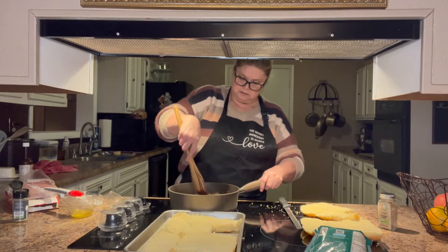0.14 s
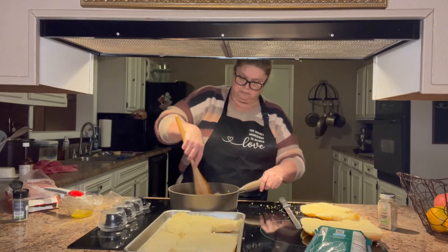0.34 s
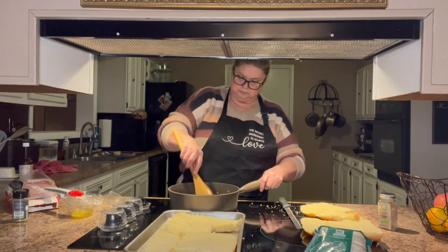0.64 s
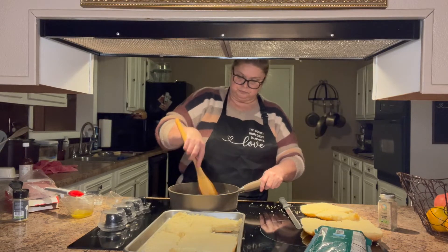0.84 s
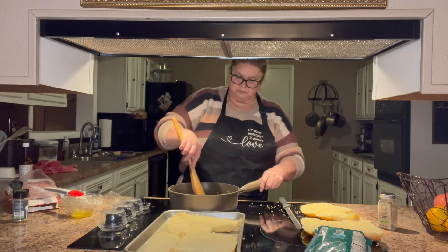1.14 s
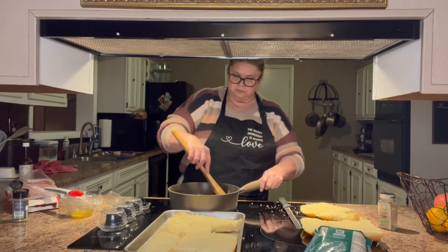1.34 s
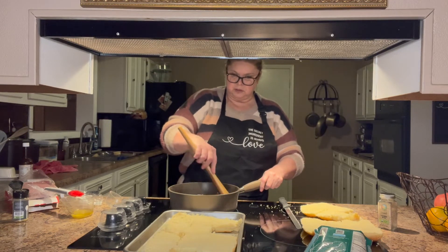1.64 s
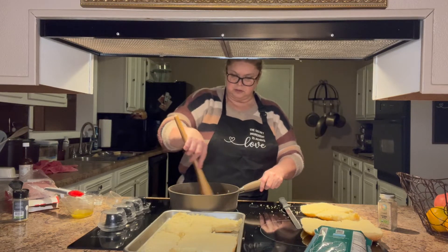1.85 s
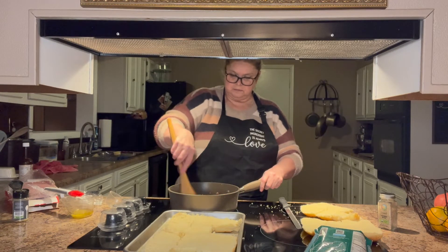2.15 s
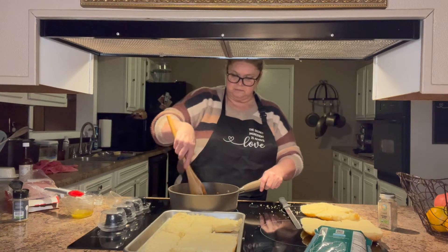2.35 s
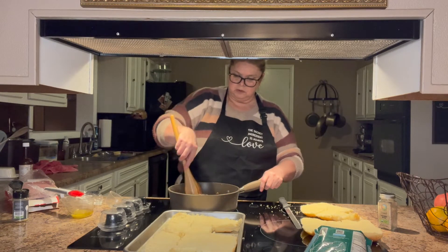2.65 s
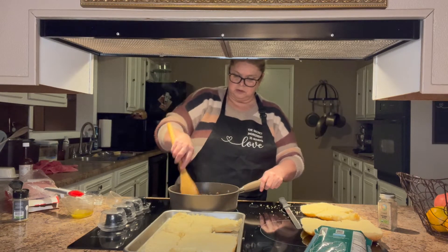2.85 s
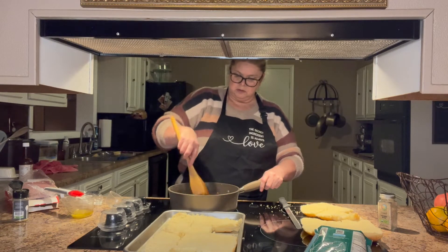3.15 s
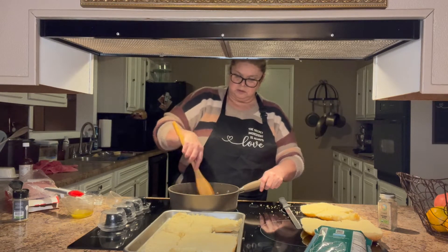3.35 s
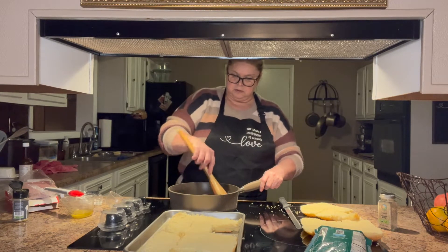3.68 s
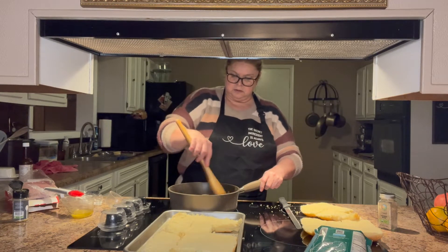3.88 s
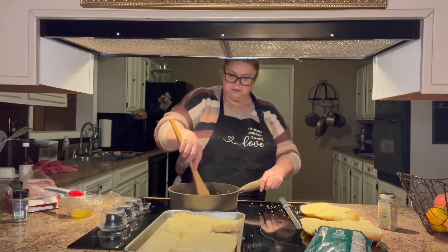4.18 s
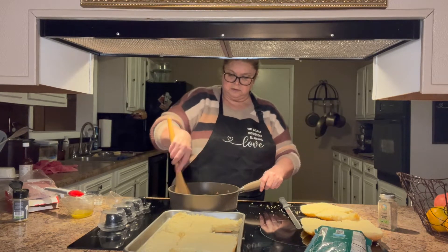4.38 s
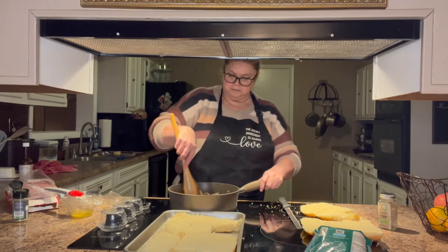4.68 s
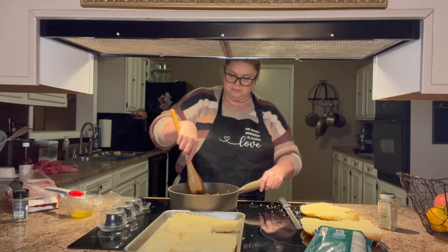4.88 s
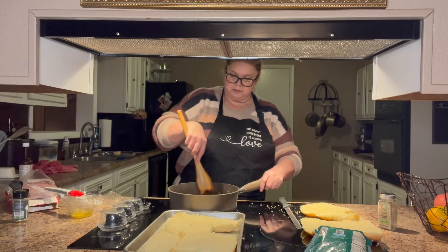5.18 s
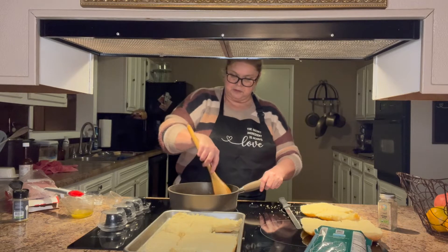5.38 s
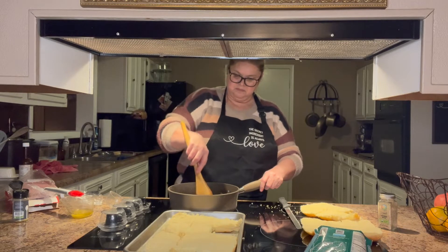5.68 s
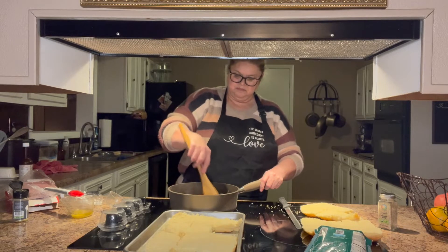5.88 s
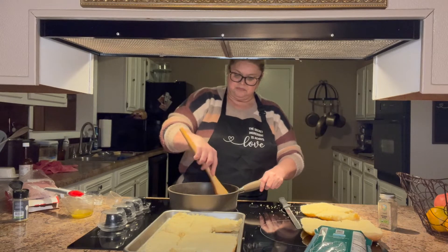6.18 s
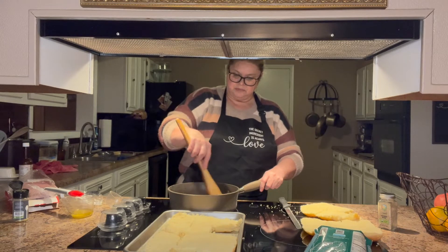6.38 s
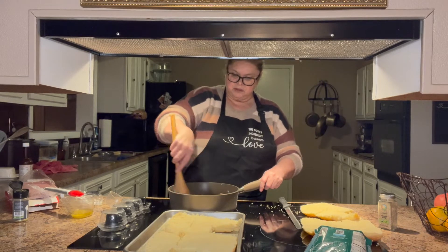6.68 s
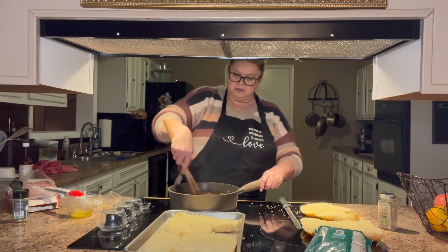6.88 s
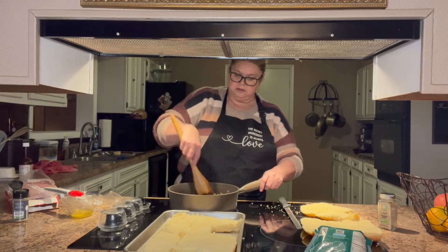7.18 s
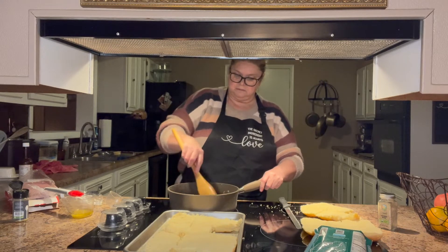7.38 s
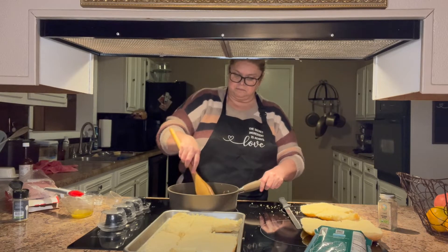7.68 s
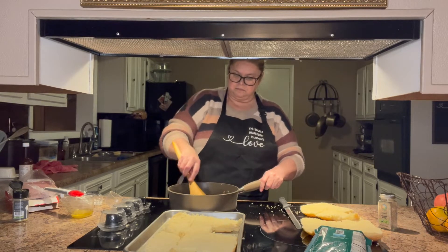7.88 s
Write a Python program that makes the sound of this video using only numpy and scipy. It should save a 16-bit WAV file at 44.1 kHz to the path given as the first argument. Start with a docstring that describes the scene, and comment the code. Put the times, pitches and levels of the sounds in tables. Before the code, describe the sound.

Irregular woody thumps and a few bright metallic pings as food is stirred in a pan, with soft sizzling and fan-like hum.

```python
"""A wooden spatula chops and stirs meat in a skillet on a glass cooktop, in a kitchen.
Each blow layers wood, pan and cooktop modes with a crack, a bright ring and a tick of bare metal.
Glancing touches ping the rim, stick-slip noise drags over the pan, and the pan drops back with dull thuds.
Below sit soft stove rumbles, a sizzle of shaped hiss and pops that swells with each spit, and a low steady whirr.
Early echoes, a flutter under the hood and a short diffuse tail place the impacts in the kitchen."""
import sys
import numpy as np
from scipy import signal
from scipy.fft import rfft, irfft, next_fast_len
from scipy.io import wavfile
from scipy.ndimage import uniform_filter1d

SR = 44100
rng = np.random.default_rng(int(sys.argv[2]) if len(sys.argv) > 2 else 0)


def master(y):
    """Save y as 16-bit WAV."""
    cut = np.clip(np.atleast_2d(y).T, -1, 1)
    pcm = np.round(cut * 32767)  # scale
    wavfile.write(sys.argv[1], SR, pcm.astype(np.int16))


N = 354123

# spatula blows: (t/s, force level/dB, contact hardness f/Hz, wood pitch factor, upper wood level/dB,
#   cooktop thud level/dB, pan ring level/dB, bare-metal level/dB,
#   share of the pan's ring time that the resting blade leaves, low cut f/Hz: glancing blows push little bass)
SPATULA_BLOWS = [(0.2401, -9, 2900, 0.98, -3.5, -7, 4.5, -8, 1, 556),
                 (0.289, 3.5, 1100, 0.93, -2.5, -2, -24, -26, 0.79, 243),
                 (.989, 2, 1550, 1.05, 9, -1, -2, -17, 0.93, 382),
                 (1.581, 2, 860, 1.04, 1.5, -3.5, -6.5, -26, 1, 246),
                 (1.932, 2.5, 1030, 1.11, 2.5, -0.5, -1, -20, 0.84, 237),
                 (2.4927, -3, 2620, 0.92, -5, 1.5, 12, -0.5, 1, 397),
                 (2.511, -6.5, 2380, 1.1, 8.5, 4, 2, -9, 1, 450),
                 (3.273, -2, 1190, 1.16, 2, 3, -8, -21, 0.35, 280),
                 (3.5899, 2.5, 1510, 1.1, -18, -9.5, -1, -6.5, 0.77, 382),
                 (4.5371, 5, 1203, 1.22, -3, -12.5, -6.5, -20, 0.85, 284),
                 (4.9333, 10, 1244, 0.95, -5.5, -7, -8.5, -23.5, 0.79, 287),
                 (5.1667, 3.5, 1480, 1.2, -15, -11, 1, -10.5, .8, 364),
                 (5.2429, 7.5, 1330, 1.01, -1, 0, -7, -19.5, 1, 260),
                 (5.5849, 7.5, 1136, 1.17, -9, -11, -10, -30.5, 0.48, 300),
                 (5.6246, -7, 880, 1.15, -3, -13, -18, -16.5, 1, 214),
                 (5.8635, 15.5, 1980, 1.19, -5.5, -12, -6.5, -18.5, 0.58, 375),
                 (5.9026, -3.5, 1020, 1, 1, -20, -5, -8, 0.64, 240),
                 (6.462, 1.5, 1056, 1.24, 6, 1, -1.5, -24, 0.84, 285),
                 (7.157, 11, 2670, 1.12, -2, -23, -26, -9, 0.81, 570),
                 (7.1804, 1.5, 1450, 1.3, -1, 1.5, 5.5, -28, 0.62, 280),
                 (7.187, 0, 1460, 0.74, -2, -5, -24, -29, 1, 280),
                 (7.83, -2.5, 900, 1.12, -6, -8, -11, -24, 0.77, 280)]
# dull spatula modes before the pitch factor: (f/Hz, level/dB, t60/s)
WOOD_MODES = [(370, -23, 0.068), (686, -8.5, 0.017), (1070, -1.5, 0.0081), (1297, -4, 0.0071),
              (1900, -38, 0.0019), (2800, -29, 0.0019)]
# pan floor and wall, damped by the food: (f/Hz, level/dB, full t60/s)
PAN_MODES = [(360, -19.5, .22), (630, -23, .15), (703, -16, .16), (765, -23, .14), (855, -18.5, .13),
             (915, -24.5, .12), (1065, -26, .09), (1280, -26, .11), (1330, -26, .12), (1485, -22.5, .1),
             (1683, -24, .12), (1998, -20.5, .04), (2215, -31, .08), (2795, -38, .07), (3200, -43, .04)]
# bright wall modes that only a touch on bare metal wakes: (f/Hz, level/dB, t60/s)
WALL_MODES = [(2240, 0, .1), (2440, -1, .1), (2798, 0, .11), (3173, -4, .11), (3690, -5, .07),
              (4340, -5, .09), (5050, -7, .06), (5560, -4, .07), (6150, -7, .04)]
# free rim before the pitch and ring-time factors: (f/Hz, level/dB, t60/s)
RIM_MODES = [(2207, -29, .2), (2322, -20.5, .25), (2348, -21.5, .26), (2362, -12, .035), (2398, -24, .22),
             (2445, -31, .2), (4301, -41, .13)]
# cooktop panel under the pan: (f/Hz, level/dB, t60/s)
PANEL_MODES = [(60, -36, .4), (233, -23, .16), (304, -13.5, .16), (361, -11.5, .17), (398, -19, .12),
               (445, -22, .1)]
# dense rumble of stove and cabinet: (f/Hz, relative level/dB)
CABINET_COLOUR = [(25, -27), (42, -6), (62, -2), (110, -2.5), (200, -3), (330, 3.5), (470, -1.5),
                  (700, -3.5), (1500, -21), (4000, -47)]
# blade drags: (t/s, length/s, level/dB, pan ring level/dB, rub pitch factor,
#   climb over the stroke/octaves, judder depth 0-1)
BLADE_DRAGS = [(1.668, 0.095, -42.5, -1, 1.04, -0.023, .5), (1.99, 0.15, -43, -20, 0.95, .3, 0.56),
               (2.075, 0.18, -42, -15, 1.014, -0.32, .5), (2.929, 0.13, -43, -10, 1.06, .6, 0.56),
               (3.298, 0.12, -41.5, -9, 0.96, 0, 0.3), (4.011, 0.2, -61, -14, 0.96, 0.021, 0.1),
               (4.26, .15, -59, 2.5, 0.86, 0, 0.3), (6.548, 0.24, -43, -17, 0.98, -0.18, 0.33),
               (6.741, 0.13, -41, -13, 0.97, -.15, 0.4), (6.82, 0.11, -51, -2.5, 0.88, -.3, .6),
               (7.243, 0.051, -27, -18, 1.3, -0.013, 0.2), (7.861, 0.1, -41, -25, 0.93, 0.041, 0.2)]
# colour of the rub before the pitch factor: (f/Hz, relative level/dB)
RUB_COLOUR = [(150, -40), (260, -25), (365, -8), (460, -16), (570, -6), (640, -5), (715, 2.5), (800, -2),
              (900, -5), (1050, -11), (1300, -12.5), (1600, -20), (1900, -27), (2300, -22), (3200, -25),
              (5000, -42)]
# soft shoves of the food that rock the pan: (t/s, length/s, level/dB)
FOOD_SHOVES = [(2.804, 0.17, -66), (4.261, 0.14, -58.5), (4.449, 0.086, -60), (5.616, 0.39, -54),
               (6.108, 0.17, -55), (6.744, 0.37, -61), (7.761, 0.088, -56)]
# colour of the sizzle: (f/Hz, relative level/dB)
STEAM_COLOUR = [(400, -25), (1200, -5), (2200, -2.5), (3200, -.7), (5000, 1), (6500, 0), (9000, 0),
                (11500, -4.5), (15500, -6.5)]
# colour of the kitchen's steady whirr: (f/Hz, relative level/dB)
WHIRR_COLOUR = [(20, -46), (45, -21), (60, 3), (85, -21), (120, -5.5), (190, -17), (450, -11.5),
                (600, -5.5), (660, -11.5), (700, 2), (750, -3.5), (870, -11.5), (1150, 0.5), (1450, -13),
                (2500, -11), (8000, -27)]
# two microphone ports: (f/Hz, likeness 0-1, phase lead of the left/rad, left minus right level/dB)
MIC_PORTS = [(60, .97, 0, -2), (140, .84, 0, -2), (300, .5, 0, -2), (1100, .4, 0, -1.5), (2500, .2, 0, -1),
             (5000, .2, .3, -4.5), (6700, .35, 3, -3), (8200, .92, 3.1, -1), (9300, .4, 3.2, 0),
             (10000, .1, 4.7, 0), (11500, .9, 6.3, 0), (13300, .2, 7.6, 0), (14600, .92, 9.4, 0)]
# first echoes from cooktop, hood and cupboards: (delay t/s, left gain, right gain)
FIRST_ECHOES = [(.0014, 0.1, 0.22), (.0062, .36, .08), (.0078, -.03, .33), (0.012, .14, .1),
                (0.0161, .15, .1)]
# decay of the diffuse tail before any added fade: (f/Hz, t60/s)
ROOM_DECAY = [(60, 0.52), (300, 0.39), (800, 0.39), (2000, 0.39), (3500, .34), (6000, 0.32), (14000, 0.16)]
# the blade glances off the free rim: (t/s, level/dB, pitch factor set by where it lands,
#   share of the ring time that the resting blade leaves, rattle depth 0-1)
RIM_GLANCES = [(.2402, -35, .9, .3, .9), (.289, -37, 1.01, .35, .8), (2.4925, -16, .85, .45, .8),
               (7.1575, -10, 1, 1, .45)]
# dry crack of wood on bare metal: (f/Hz, relative level/dB)
CRACK_COLOUR = [(80, -50), (400, 17), (1500, 19), (2600, 11.5), (3400, 14), (4300, 0), (5500, 10),
                (8000, -6), (11000, -5), (15000, -48)]
# juice squeezed onto hot metal spits: (t/s, length/s, peak level/dB before the hiss and pop gains)
JUICE_SPITS = [(0.153, 0.44, -62), (1.704, 0.18, -55.5), (1.9, 0.27, -60), (2.654, 0.15, -51.5),
               (2.828, 0.1, -54), (2.932, 0.21, -58), (3.41, 0.11, -58), (3.936, 0.26, -54.5),
               (4.22, 0.14, -55.5), (4.906, 0.3, -61), (5.237, 0.92, -60.5), (5.63, 0.41, -49.5),
               (6.067, 0.045, -69.5), (6.563, 0.15, -50.5), (7.304, 0.17, -53), (7.61, 0.45, -61.5)]
# the jolted pan drops back onto the cooktop: (t/s, relative level/dB)
PAN_DROPS = [(2.569, 0), (2.628, -11), (5.601, -3), (5.901, -5), (7.215, -9)]

EDGE_HZ = 15350  # top of the whole mix
RING_T = np.arange(int(.7 * SR)) / SR  # time axis of rings and tails, s
DRAG_ATTACK_S, DRAG_RELEASE_S = 0.053, 0.074  # the blade picks up speed, then slows
SLIPS_PER_S, SLIP_SPREAD_DB, RUB_SHARE = 3000, 1.0, .3  # rub: smooth noise gain against the slips
DRAG_GLIDE_OCTAVES = .15  # the rub is higher in mid stroke, where the blade is fastest
JUDDER_HZ, JUDDER_JITTER = 95, .3  # nominal catches a second, their relative unevenness (rms)
JUDDER_FADE = .3  # time constant of each slide, as a share of a cycle
CHATTER_S, RIM_FREE_S = .006, .24  # smoothing of the rattle; half-gain time as the blade stops the rim
SIZZLE_DB = -57  # meat lying still, before the hiss and pop gains
JUICE_DB, BOIL_OFF_S = -1, 1  # juice left by each spit keeps the sizzle up; time constant of its power
SPUTTER_DB, SPUTTER_S = .6, .04  # rms level swing and its smoothing


def amp(db):
    """Decibels to gain."""
    return 10 ** (np.asarray(db) / 20)


def unit(x):
    """Scales to an rms of one."""
    return x / np.sqrt(np.mean(x ** 2) + 1e-20)


def read(points, hz, axis=1):
    """Reads one table column along straight lines over log frequency."""
    table = np.transpose(points)
    return np.interp(np.log(hz + 1), np.log(table[0] + 1), table[axis])


def add(mix, s, sound):
    """Drops a sound into the mix at time s and trims what runs past the end."""
    part = mix[:, max(round(s * SR), 0):][:, :sound.shape[-1]]
    part += sound[..., :part.shape[-1]]


def colour(x, points):
    """Paints a smooth spectrum onto x and levels it to an rms of one."""
    count = x.shape[-1]
    size = next_fast_len(count + SR // 10)
    gain = amp(read(points, np.fft.rfftfreq(size, 1 / SR)))
    return unit(irfft(rfft(x, size) * gain, size)[..., :count])


def ports(pair):
    """Blends two unrelated noises into one diffuse sound as the two ports hear it."""
    size = next_fast_len(pair.shape[-1])
    hz = np.fft.rfftfreq(size, 1 / SR)
    shared, other = rfft(pair, size)
    same = np.clip(read(MIC_PORTS, hz), 0, 1)
    lean = amp(read(MIC_PORTS, hz, axis=3) / 2)  # half the level difference on each side
    right = same * shared + np.sqrt(1 - same ** 2) * other
    right = right * np.exp(-1j * read(MIC_PORTS, hz, axis=2))
    return irfft(np.array([shared * lean, right / lean]), size)[:, :pair.shape[-1]]


def ring(modes, pitch=1, length=1):
    """A tapped body rings as a sum of exponentially dying sines."""
    return sum(amp(db - 60 * RING_T / (t60 * length)) * np.sin(2 * np.pi * hz * pitch * RING_T)
               for hz, db, t60 in modes)


def tail(rise_s):
    """A diffuse stereo tail swells, then dies band by band; mean energy per port is one."""
    noise = ports(rng.standard_normal((2, len(RING_T))))
    hz, t, bands = signal.stft(noise, SR, nperseg=256)
    fade = amp(-60 * t / read(ROOM_DECAY, hz)[:, None])
    dying = signal.istft(bands * fade, SR, nperseg=256)[1][:, :len(RING_T)]
    swell = 1 - np.exp(-(RING_T / rise_s) ** 2)
    return unit(dying * swell) / np.sqrt(len(RING_T))


def kitchen(x, wet_db, hood_db, hood_t60=0.048, lean_db=1.0):
    """Direct sound, first echoes, a quick flutter under the hood and the room's tail."""
    room = amp(wet_db) * tail(rise_s=0.015)
    flutter = amp(hood_db) * tail(rise_s=0.00053) * amp(-60 * RING_T / hood_t60)  # fade on top of the room's
    paths = room + flutter
    paths[0, 2] += amp(-lean_db)  # the left port is a little further from the pan: two samples later
    paths[1, 0] += amp(lean_db)
    for delay, left, right in FIRST_ECHOES:
        paths[:, round(abs(delay) * SR)] += left, right
    return signal.fftconvolve(x[None], paths, axes=1)


def contact(x, hardness_hz):
    """A softer contact takes the treble away: a fourth-order low-pass."""
    return signal.sosfilt(signal.butter(N=4, Wn=min(hardness_hz, SR / 3), fs=SR, output="sos"), x)


def whirr(level_db=-61):
    """Steady moving air: shaped noise with two soft resonances over a low hum."""
    return amp(level_db) * colour(ports(rng.standard_normal((2, N))), WHIRR_COLOUR)


def sizzle(hiss_db=1):
    """Countless small steam bubbles merge into a hiss; the larger ones pop singly."""
    pops_db, pops_per_s, spread_db = -9, 700, 2.8
    spitting = np.zeros((1, N))  # power, so that overlapping spits add up naturally
    for start, length, db in JUICE_SPITS:
        add(spitting, start, amp(db) ** 2 * np.hanning(int(length * SR)))
    keep = np.exp(-1 / (BOIL_OFF_S * SR))
    juice = amp(JUICE_DB) ** 2 * signal.lfilter([1 - keep], [1, -keep], spitting)
    power = amp(SIZZLE_DB) ** 2 + spitting + juice

    hiss = colour(ports(rng.standard_normal((2, N))), STEAM_COLOUR)
    pop_gain = amp(spread_db * np.minimum(rng.exponential(1, (2, N)), 5))
    bursts = (rng.random((2, N)) < pops_per_s / SR) * pop_gain
    pops = colour(ports(bursts * rng.choice([-1, 1], (2, N))), STEAM_COLOUR)
    wander = unit(uniform_filter1d(rng.standard_normal(N), int(SPUTTER_S * SR)))
    sputter = amp(SPUTTER_DB * wander)
    return np.sqrt(power) * sputter * (amp(hiss_db) * hiss + amp(pops_db) * pops)


def shoves():
    """Pushed food rocks the pan: swells of shaped noise rumble faintly in the stove."""
    out = np.zeros((2, N))
    for s, length, db in FOOD_SHOVES:
        count = int(length * SR)
        rumble = colour(ports(rng.standard_normal((2, count))), CABINET_COLOUR)
        add(out, s, amp(db) * rumble * np.hanning(count))
    return out


def rocks(panel_db=-31, cabinet_db=-44, panel_rise_s=0.0025, hardness_hz=300, settle_t60=.3):
    """The pan's base lands with a dull thud in cooktop and cabinet; its weight soon stills them."""
    out = np.zeros((2, N))
    panel = amp(panel_db) * ring(PANEL_MODES) * (1 - np.exp(-RING_T / panel_rise_s))
    for s, db in PAN_DROPS:
        sound = kitchen(panel, wet_db=-24.0, hood_db=-4.0)
        add(sound, 0, amp(cabinet_db) * colour(tail(rise_s=0.0021), CABINET_COLOUR))
        thud = contact(sound[:, :len(RING_T)], hardness_hz)
        add(out, s, amp(db - 60 * RING_T / settle_t60) * thud)
    return out


def judder(t, depth):
    """The blade catches and lets go at an uneven rate, so the rub comes in short slides."""
    wander = unit(uniform_filter1d(rng.standard_normal(len(t)), int(SR / JUDDER_HZ)))
    turns = np.cumsum(JUDDER_HZ * (1 + JUDDER_JITTER * wander)) / SR
    slides = unit(np.exp(-(turns % 1) / JUDDER_FADE))
    depth = np.clip(depth, 0, 1)
    return unit(1 - depth + depth * slides)


def drags(room_db=-8):
    """Stick-slip: a dense run of tiny taps over a smooth rub; the pan's low modes ring along."""
    out = np.zeros((2, N))
    pan = ring(PAN_MODES[:8])
    pan /= np.linalg.norm(pan)
    for s, length, db, ring_db, pitch, climb, depth in BLADE_DRAGS:
        t = np.arange(0, length, 1 / SR)
        speed = np.minimum(t / DRAG_ATTACK_S, 1) * np.minimum((length - t) / DRAG_RELEASE_S, 1)
        slip_gain = amp(SLIP_SPREAD_DB * rng.standard_normal((2, len(t))))
        slips = (rng.random((2, len(t))) < SLIPS_PER_S / SR) * slip_gain
        friction = unit(slips - slips.mean() + RUB_SHARE * rng.standard_normal((2, len(t))))
        friction = judder(t, depth) * friction

        # reading the coloured rub at a varying rate bends its pitch
        glide = DRAG_GLIDE_OCTAVES * (np.sin(np.pi * t / length) - np.pi / 4)
        travel = np.cumsum(2 ** (climb * (t / length - .5) + glide)) / SR
        rub = colour(ports(friction), [(hz * pitch, level) for hz, level in RUB_COLOUR])
        rub = speed * np.array([np.interp(travel, t, side) for side in rub])
        metal = amp(ring_db) * signal.fftconvolve(speed * friction[0], pan)
        add(out, s, amp(db) * rub)
        add(out, s, amp(db + room_db) * signal.fftconvolve(rub, tail(rise_s=0.0025), axes=1))
        add(out, s, amp(db) * kitchen(metal, wet_db=-11, hood_db=-12))
    return out


def rim():
    """The free rim pings; noise on its level roughens the ring as the blade rattles against it."""
    out = np.zeros((2, N))
    settle = 1 / (1 + (RING_T / RIM_FREE_S) ** 8)  # the blade settles and stops the rim
    for s, db, pitch, length, rattle in RIM_GLANCES:
        wander = unit(uniform_filter1d(rng.standard_normal(len(RING_T)), int(CHATTER_S * SR)))
        ping = ring(RIM_MODES, pitch, length) * (1 + rattle * wander) * settle
        add(out, s, amp(db) * kitchen(ping, wet_db=-10, hood_db=-6))
    return out


def crack(crack_t60=0.012):
    """A few milliseconds of chatter as the blade's edge meets metal: broad, with no pitch."""
    t = RING_T[:SR // 20]
    fade = amp(-60 * t / crack_t60)
    phase = np.angle(rfft(rng.standard_normal(len(t)) * fade))
    even = irfft(np.exp(1j * phase), len(t))  # flat spectrum, only the phases are random
    burst = colour(even, CRACK_COLOUR) * np.sqrt(fade)
    return burst * np.linalg.norm(fade) / np.linalg.norm(burst)


def tick():
    """The thin, bright snap of first touch: a very short burst of noise."""
    t = RING_T[:SR // 50]
    return contact(rng.standard_normal(len(t)), 14000) * amp(-60 * t / .004)


def blows(wood_db=-21.0, pan_db=-19.5, wall_db=-41, panel_db=-20, cabinet_db=-50.5, crack_db=-23.0,
          tick_db=-28.5, panel_rise_s=0.0076):
    """Each blow sounds wood and pan at once; the cooktop swells in a moment later."""
    out = np.zeros((2, N))
    for (s, force_db, hardness_hz, pitch, upper_db, thud_db, ring_db, bare_db,
         ring_share, low_hz) in SPATULA_BLOWS:
        radiation = signal.butter(2, low_hz, "high", fs=SR, output="sos")  # small bodies radiate little bass
        # where the blade lands decides how strongly its upper modes sound
        wood = ring(WOOD_MODES[:2], pitch) + amp(upper_db) * ring(WOOD_MODES[2:], pitch)
        wood = amp(wood_db) * signal.sosfilt(radiation, wood)
        metal = signal.sosfilt(radiation, ring(PAN_MODES, length=ring_share))
        metal = amp(pan_db + ring_db) * metal
        panel = amp(panel_db + thud_db) * ring(PANEL_MODES) * (1 - np.exp(-RING_T / panel_rise_s))

        body = kitchen(wood, wet_db=-9.0, hood_db=7.0)
        body += kitchen(panel, wet_db=-10, hood_db=-1.5)
        body += kitchen(metal, wet_db=-7, hood_db=7)
        add(body, 0, amp(cabinet_db + thud_db) * colour(tail(rise_s=0.0067), CABINET_COLOUR))
        add(out, s, amp(force_db) * contact(body, hardness_hz))  # food cushions the blow

        # bare-metal layers keep their treble
        bare_force_db = force_db + bare_db
        add(out, s, amp(bare_force_db + crack_db) * kitchen(crack(), wet_db=-3, hood_db=8.5))
        add(out, s, amp(bare_force_db + wall_db) * kitchen(ring(WALL_MODES), wet_db=-8, hood_db=6))
        add(out, s, amp(bare_force_db + tick_db) * kitchen(tick(), wet_db=-27, hood_db=7))
    return out


def scene():
    """Everything at the stove, from the background to the blows."""
    return whirr() + sizzle() + shoves() + rocks() + drags() + rim() + blows()


def record(dry):
    """Band-limits the mix with a steep linear-phase low-pass."""
    lowpass = signal.firwin(401, EDGE_HZ, window=("kaiser", 8), fs=SR)
    return signal.oaconvolve(dry, lowpass[None], "same")


dry = scene()
out = record(dry)
master(out)
```